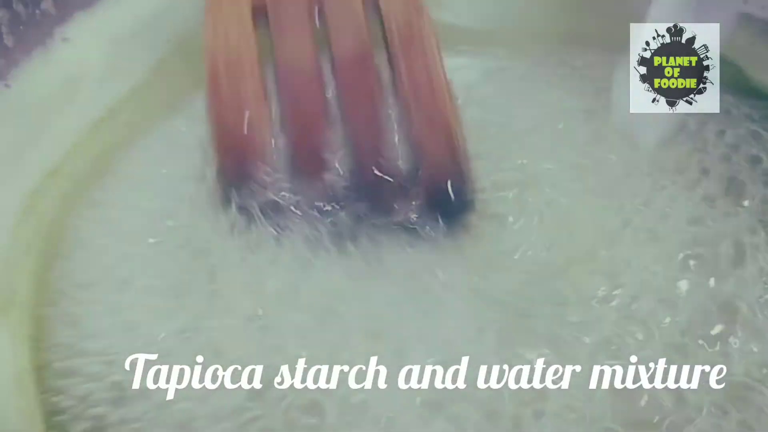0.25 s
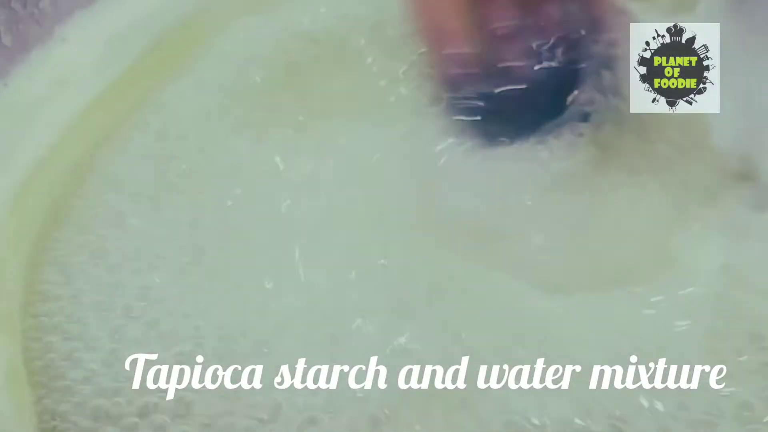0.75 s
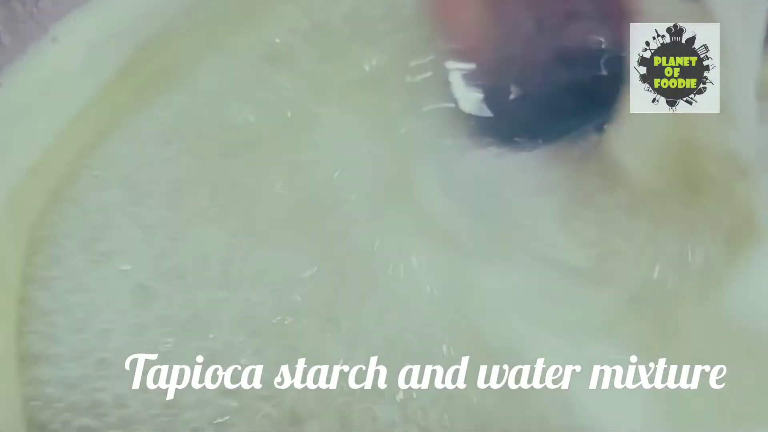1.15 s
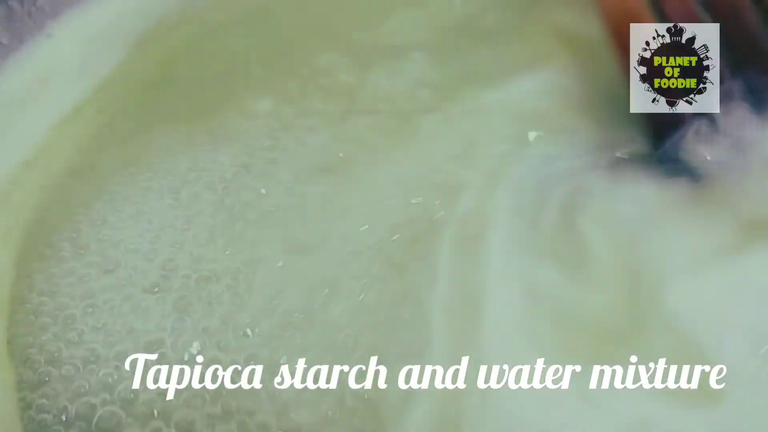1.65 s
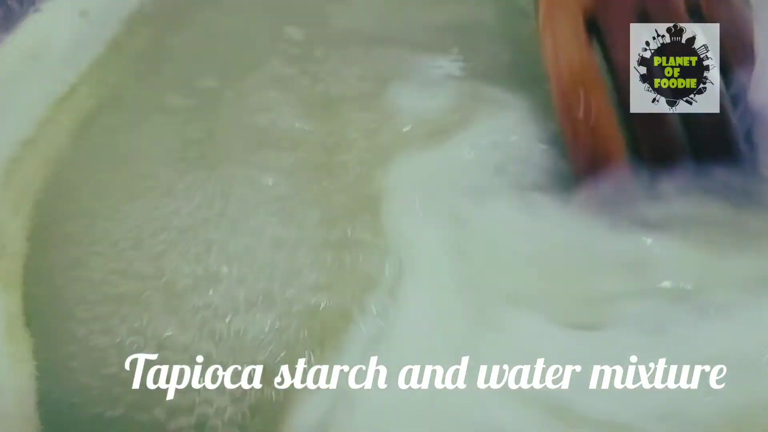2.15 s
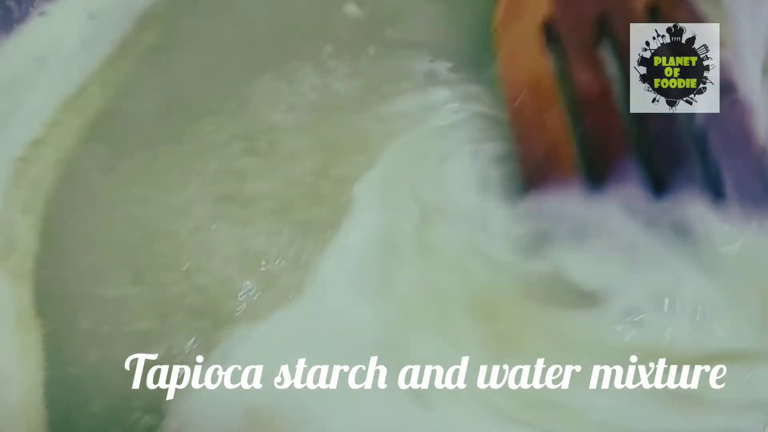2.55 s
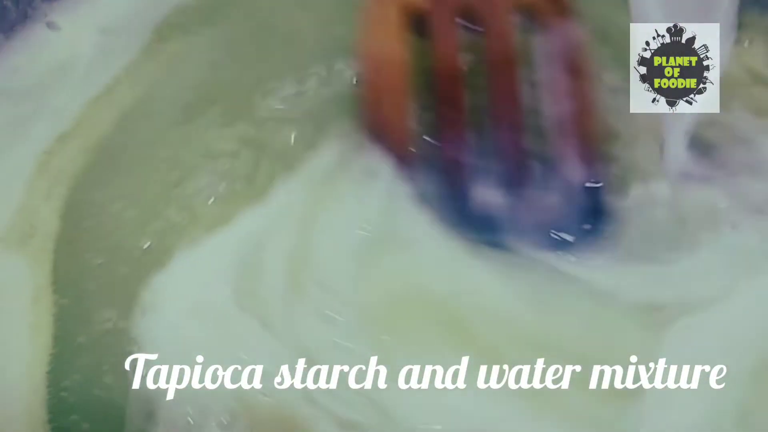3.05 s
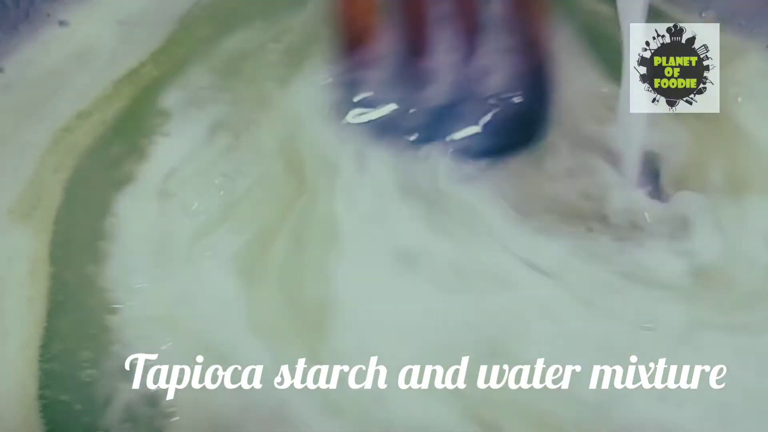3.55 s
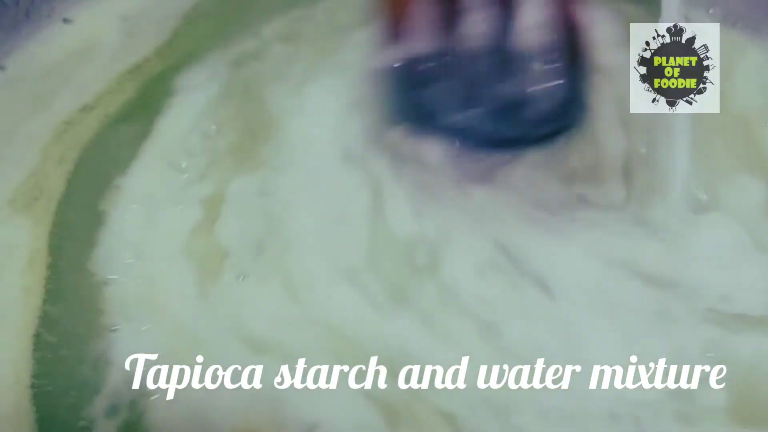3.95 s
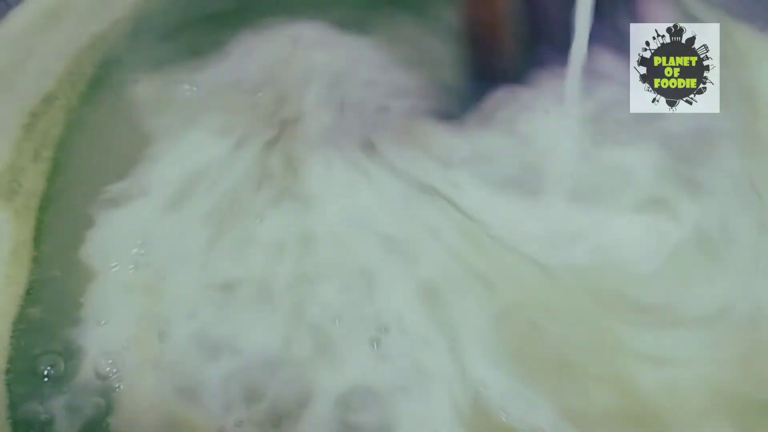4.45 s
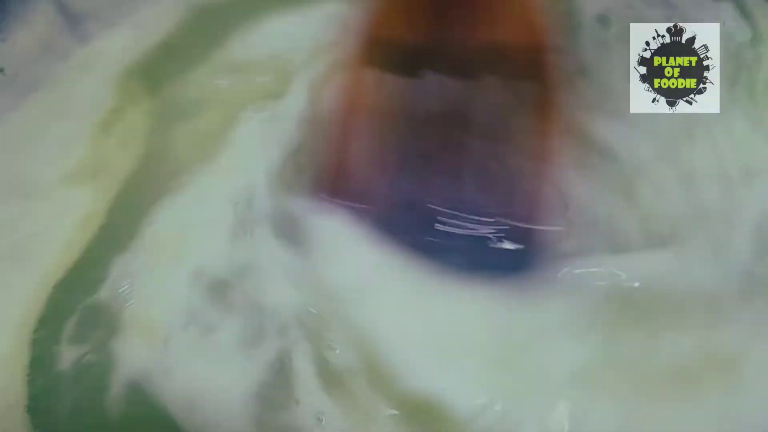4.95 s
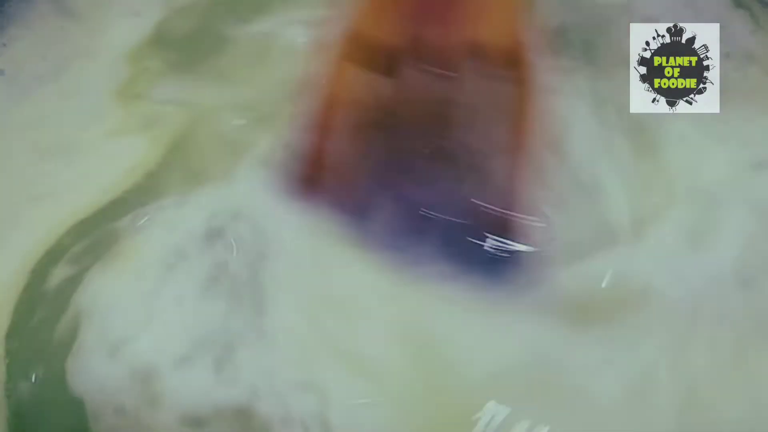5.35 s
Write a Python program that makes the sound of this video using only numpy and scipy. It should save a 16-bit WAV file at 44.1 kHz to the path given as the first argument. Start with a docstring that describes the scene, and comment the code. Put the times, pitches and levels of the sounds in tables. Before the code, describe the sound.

Close wet sizzling and bright popping over a foamy simmer, calming as thick liquid is stirred, with soft wooden bumps near the end.

```python
"""Stirring starch slurry into boiling syrup with a wooden spatula, close, over a kitchen's hum and rush.
From the start: dense simmer (swarms of filtered bubble rings), fading as the slurry cools it; brief dip at 0.3 s.
From 0.3 s: strokes wash syrup up the hot wall: sizzle (bubble swarms) and crackle (snapping droplets), sparse
after 4.5 s. From 0.7 s: foam dragged through the spatula (higher bubbles). From 0.9 s: air plops (rising rings).
From 1.8 s to the end: knocks on the pan (noise cracks and damped modes)."""
import sys
import numpy as np
from scipy import signal
from scipy.fft import rfft, irfft
from scipy.io import wavfile
from scipy.ndimage import uniform_filter1d

SR = 44100
rng = np.random.default_rng(int(sys.argv[2]) if len(sys.argv) > 2 else 0)


def int16_out(signal):
    """Quantize to a 16-bit WAV file."""
    q = np.round(np.clip(np.atleast_2d(signal).T, -1, 1) * 32767)
    wavfile.write(sys.argv[1], SR, q.astype(np.int16))


N = 246738
TIME_S = np.arange(N) / SR

# background hum: f/Hz, level/dB
HUM_TONES = [(42, -64), (121.5, -50.5)]
# spectrum of the kitchen rush: f/Hz, relative density/dB per Hz
RUSH_SPECTRUM = [(20, -3), (32, -2), (42, 13), (60, 4), (85, -2), (190, 4), (300, -3.5), (430, -3),
                 (900, -10), (1300, -24.5), (1900, -18.5), (2900, -52.5), (5000, -63.5)]
# simmer level, dips briefly, then fades with cooling: t/s, level/dB
SIMMER_LEVEL = [(0, -37.5), (0.29, -38.5), (0.32, -47.5), (0.375, -46.5), (0.41, -37.5), (0.5, -41.5),
                (0.75, -39.5), (0.95, -40), (1.3, -43), (1.7, -44.5), (2.2, -45), (3.5, -52.5),
                (5.6, -57.5)]
# filter of the simmering foam: f/Hz, gain/dB
FOAM_FILTER = [(150, -30), (430, -7), (540, -8), (800, -2), (1100, -4), (1500, -10.5), (1950, -10.5),
               (2400, -21), (3000, -48.5)]
# filter of the rolling boil: f/Hz, gain/dB
BOIL_FILTER = [(750, -1), (980, 1), (1300, -5.5), (1600, -15.5)]
# spectrum of the finest froth: f/Hz, relative density/dB per Hz
FROTH_SPECTRUM = [(3000, -16.5), (4500, -8), (6500, 10), (8500, -38.0), (10000, -50.5)]
# spatula dragged through foam: t/s, length/s, level/dB
SWIRL_STROKES = [(0.702, 0.13, -51.5), (1.07, 0.19, -51.5), (4.19, 0.014, -56)]
# filter of the dragged foam: f/Hz, gain/dB
SWIRL_FILTER = [(900, -11.5), (1400, -3.5), (1900, -1.5), (2300, -8), (2900, -15)]
# filter of the small pops: f/Hz, gain/dB
SQUELCH_FILTER = [(800, -5.5), (2000, -2.0), (2700, -9.0)]
# air pockets closed by the spatula: t/s, f/Hz, level/dB, ring to -20 dB/cycles, pitch rise/share
AIR_PLOPS = [(0.912, 1030, -39.5, 16, 0.049), (0.952, 565, -37.5, 19, 0.046), (1.401, 1490, -39, 19, 0.086),
             (1.439, 997, -36, 17, 0.18), (1.501, 2020, -43.5, 19, .08), (1.538, 2950, -46, 10, .15),
             (1.614, 1480, -39.5, 16, 0.12), (1.732, 1950, -36, 23, 0.079), (1.774, 1660, -42, 17, .1),
             (1.817, 2650, -44.5, 30, .04), (1.832, 1910, -36, 13, 0.14), (1.888, 1390, -43, 14, .08),
             (2.258, 1440, -35.5, 14, .1), (2.623, 1054, -35, 24, 0.15), (2.764, 1650, -35, 6.4, 0.069),
             (3.127, 1330, -44.5, 24, 0.037), (3.193, 3540, -43.5, 9, .1), (3.193, 2030, -41, 6.5, 0.11),
             (3.237, 2480, -45.5, 22, 0.055), (3.237, 996, -35.5, 15, 0.28), (3.275, 1760, -46, 25, 0.12),
             (3.486, 2050, -47.5, 14, 0.045), (3.569, 2340, -43.5, 30, 0.07), (3.802, 3580, -54, 46, 0.11),
             (3.921, 1890, -48, 14, .06), (4.318, 1830, -47, 9, 0.11), (4.4, 1120, -31, 5.9, 0.21),
             (4.416, 1780, -44, 8.8, .1), (4.43, 1840, -40, 9.4, .06), (4.457, 1170, -42, 6.9, .1),
             (4.498, 1780, -45, 12, .05), (5.143, 1480, -47.5, 14, 0.12)]
# spatula on pan, before room and tone filter: t/s, level/dB, blow centre f/Hz, ring against crack level/dB
PAN_KNOCKS = [(1.8173, -46, 2170, -15), (2.8258, -30, 740, 2), (3.912, -50.5, 1850, -3.5),
              (3.9936, -34.5, 1970, -17), (4.069, -41.5, 1500, -20), (4.237, -39.5, 840, -11),
              (4.430, -31.5, 1080, -19), (4.474, -35, 950, -7), (4.760, -42.5, 1997, -20),
              (4.929, -38, 654, -15), (5.2824, -35, 620, -17), (5.537, -45.5, 1310, 3)]
# modes of the filled pan: f/Hz, level/dB, t60/s
PAN_MODES = [(409, -1.5, 0.37), (500, 7.5, 0.04), (651, -1, 0.1), (868, -8, 0.23), (1064, -2, 0.17),
             (1257, -4.5, 0.059), (1720, -9.5, 0.46), (1980, -4.5, 0.42), (2428, -6.5, 0.18),
             (2700, -6.5, 0.12), (4190, 5, 0.19), (4560, 10.5, 0.34), (5060, 5.5, 0.29), (5720, 2, 0.15)]
# tone filter of the knocks: f/Hz, gain/dB
KNOCK_FILTER = [(200, 3), (5400, -3.5), (8000, -18.5)]
# strokes washing syrup up the wall: t/s, length/s, wetness as a sizzle level/dB
WALL_STROKES = [(0.281, .1, -39), (0.437, .12, -39), (0.635, .24, -35), (0.969, .45, -38),
                (1.507, .13, -33), (1.723, .27, -38.5), (2.195, .2, -37.5), (2.549, .17, -39),
                (2.798, .015, -35), (3.02, .03, -40), (3.168, .24, -39), (3.568, .14, -39.5),
                (3.785, .02, -40), (3.99, .06, -40.5), (4.148, .05, -39), (4.299, .14, -36),
                (4.737, .02, -43), (4.861, .05, -42), (5.096, .04, -40), (5.256, 0.028, -42),
                (5.444, .02, -42), (5.531, .03, -38.5)]
# filter of sizzle and droplets: f/Hz, gain/dB
SIZZLE_FILTER = [(1500, -26), (2300, -30), (3000, -44.5), (3700, -35.5), (4500, -23.5), (5100, -20.5),
                 (6300, -16.5), (7050, -5.5), (7550, 0.5), (7850, -8), (8150, -23), (8450, -37.5),
                 (9200, -41.5), (11000, -62), (15000, -79)]
# faint, very high noise ticks: t/s, peak level/dB
HIGH_TICKS = [(0.2839, -41), (0.4514, -47), (0.704, -40), (1.5547, -35.5), (3.665, -45)]
# spectrum of the high ticks: f/Hz, relative density/dB per Hz
HIGH_TICK_SPECTRUM = [(7000, -8.5), (9000, 5.5), (11500, 2), (15500, -14)]
# clear, short, high rings: t/s, f/Hz, level/dB
CLEAR_PINGS = [(0.305, 6050, -30), (0.556, 5800, -24), (0.5826, 4660, -35.5), (0.69, 5760, -32),
               (0.848, 6050, -26), (0.863, 5040, -26.5), (0.948, 5900, -25), (1.296, 5480, -30),
               (1.398, 5200, -30), (1.416, 5470, -29), (1.536, 5750, -30), (1.699, 5340, -32),
               (2.24, 4700, -36.5), (2.6255, 4560, -34), (2.795, 5100, -40), (2.8156, 4700, -36),
               (3.5894, 4980, -31.5), (4.273, 4730, -34), (4.3015, 5040, -24), (4.3775, 5900, -25.5),
               (4.42, 5300, -34), (4.4298, 5180, -25.5), (5.195, 4700, -40), (5.281, 4450, -35)]
# loudest droplets bursting on the wall: t/s (the peak follows about 1 ms later), peak level/dB
LOUD_CRACKLES = [(0.2548, -25), (0.263, -21.5), (0.3051, -6.5), (0.3614, -19), (0.3729, -21), (0.4604, -6),
                 (0.543, -19.5), (0.556, -9), (0.5995, -20.0), (0.6371, -6.5), (0.6918, -15),
                 (0.706, -14.5), (0.7254, -9.5), (0.776, -19), (0.7797, -22.5), (0.815, -14.5),
                 (0.8195, -20), (0.8253, -20.0), (0.837, -13), (0.8473, -26), (0.8552, -10), (0.863, -12.5),
                 (0.948, -27), (0.9616, -21), (0.9735, -12.5), (0.977, -21), (0.995, -16.5), (1.0298, -21),
                 (1.0788, -21.0), (1.088, -18.5), (1.1854, -19.5), (1.2212, -17.5), (1.2249, -14.5),
                 (1.2442, -16.5), (1.2637, -16.5), (1.299, -10.5), (1.367, -10), (1.393, -18),
                 (1.3967, -7.5), (1.4003, -14), (1.4156, -20.5), (1.472, -13.5), (1.4895, -27),
                 (1.501, -17.0), (1.5366, -13), (1.558, -7.5), (1.566, -13), (1.5741, -9.5), (1.6163, -15),
                 (1.6245, -12), (1.6445, -15.0), (1.6972, -18.5), (1.7315, -25), (1.8123, -14.0),
                 (1.817, -11), (1.8289, -20), (1.852, -20.5), (1.9433, -16.5), (1.981, -21),
                 (1.9932, -21.5), (2.1982, -16.5), (2.2033, -21.0), (2.2396, -16), (2.2588, -14.5),
                 (2.3193, -12.5), (2.35, -15), (2.3941, -16), (2.41, -18.0), (2.5727, -16.0),
                 (2.6254, -18.5), (2.6425, -17.0), (2.6714, -21.5), (2.7204, -13), (2.738, -19),
                 (2.7462, -22.0), (3.0319, -18), (3.1163, -20.5), (3.182, -15), (3.202, -12),
                 (3.2073, -10.5), (3.2763, -15), (3.2882, -7.5), (3.321, -20.5), (3.3564, -22),
                 (3.3768, -16.5), (3.4636, -25), (3.5538, -10.5), (3.568, -21), (3.5884, -14.0),
                 (3.6168, -19), (3.6327, -18), (3.6453, -16.5), (3.6538, -18.5), (3.6633, -25),
                 (3.6934, -16), (3.7003, -10.5), (3.7061, -18), (3.912, -22), (3.993, -13), (4.0092, -13.5),
                 (4.0587, -22), (4.0963, -17.5), (4.1686, -11.5), (4.2337, -13.5), (4.2719, -16.5),
                 (4.2996, -18), (4.3022, -11.5), (4.3163, -18), (4.3364, -21), (4.3684, -13.5),
                 (4.3777, -20), (4.388, -17), (4.4294, -16), (4.439, -22), (4.5154, -22), (4.844, -20.5),
                 (5.2829, -14), (5.5375, -17.5)]

BOIL_DB, BOIL_COOLING_DB_PER_S = -1.5, 4.5  # boil against simmer
FROTH_START_DB, FROTH_COOLING_DB_PER_S = -51.5, 3.5
SQUELCH_DB = -22.5  # against wall wetness
WASH_ATTACK_S, WASH_RELEASE_S = 0.044, 0.071  # syrup runs up, boils off
RIM_START_DB, RIM_COOLING_DB_PER_S = -42, 0.66  # wetness between strokes
DROPLET_COUNT, DROPLET_PEAK_DB = 110, 11  # lesser droplets; peak against wetness
SNAP_HZ, SNAP_SPREAD_SHARE, SNAP_RISE_S = 7136, 0.074, 0.0011  # droplet ring; its time to peak
DROPLET_LOW_HZ, DROPLET_HIGH_HZ, DROPLET_BUBBLE_DB = 5110, 6890, -24.5  # bubble; level against snap's peak
TOP_HZ = 15800


def undb(db):
    """Decibels to gain."""
    return 10 ** (np.asarray(db) / 20)


def level(x, db):
    """Scale to an rms level."""
    return x * undb(db) / np.sqrt(np.mean(x ** 2))


def burst_level(x, db, size=176):
    """Scale a short sound so that its loudest 4 ms have this rms level."""
    return x * undb(db) / np.sqrt(uniform_filter1d(x ** 2, size).max())


def colour(x, points):
    """Zero-phase filter through (Hz, dB) points, falling 20 dB per octave beyond its ends."""
    hz, db = np.transpose(points)
    octave = np.log2(np.maximum(np.fft.rfftfreq(len(x), 1 / SR), 1))
    beyond = np.abs(octave - np.clip(octave, np.log2(hz[0]), np.log2(hz[-1])))
    gain_db = np.interp(octave, np.log2(hz), db) - 20 * beyond
    return irfft(rfft(x) * undb(gain_db), len(x))


def walk(rate_hz):
    """Smoothed random steps with an rms of 1."""
    size = max(int(SR / rate_hz), 1)
    steps = np.repeat(rng.standard_normal(N // size + 1), size)[:N]
    smooth = uniform_filter1d(uniform_filter1d(steps, size), size)
    return level(smooth, 0)


def add(out, start_s, x):
    """Mix a short sound in at a time."""
    start = int(np.clip(start_s * SR, 0, N))
    out[start:start + len(x)] += x[:N - start]


def swell(start_s, length_s, attack_s, release_s):
    """Stroke envelope: rises before start_s, holds, dies away exponentially."""
    rise = np.clip(1 + (TIME_S - start_s) / attack_s, 0, 1)
    return rise * np.exp(-np.maximum(TIME_S - start_s - length_s, 0) / release_s)


def bubble(t_s, hz, cycles, rise):
    """Damped bubble ring: fades 20 dB in the given cycles while its pitch rises by the share."""
    age = t_s * hz / cycles
    phase = 2 * np.pi * hz * t_s * (1 + rise * np.minimum(age, 2) / 2)
    return np.sin(phase) * 10 ** -age


def swarm(low_hz, high_hz, cycles, rise, spread_db, count, size):
    """Sum of small bubbles with random times, pitches, dampings and strengths."""
    when, pitch, loud, damping = rng.random((count, 4)).T
    hz = low_hz * (high_hz / low_hz) ** pitch
    rings = bubble(np.arange(size) / SR, hz[:, None], cycles * (.5 + damping[:, None]), rise)
    gain = undb(-spread_db * np.sqrt(loud))  # many faint, few strong
    at = (when * N).astype(int)[:, None] + np.arange(size)
    return np.bincount(at.ravel(), (rings * gain[:, None]).ravel(), N)[:N]


def room(x, t60_s=0.21, wet_db=-11, size=12000):
    """Worktop and walls reflect a short decaying noise tail."""
    tail = rng.standard_normal(size) * np.exp(-np.log(1000) * np.arange(size) / SR / t60_s)
    return x + undb(wet_db) * signal.fftconvolve(x, tail / np.linalg.norm(tail))[:N]


def kitchen(waver=0.66, phase_waver_rad=0.69):
    """Steady low filtered noise plus a hum that wavers in pitch and strength."""
    out = level(colour(rng.standard_normal(N), RUSH_SPECTRUM), -45)
    for hz, db in HUM_TONES:
        tone = np.sin(2 * np.pi * hz * TIME_S + phase_waver_rad * walk(10))
        out += level(tone * (1 + waver * walk(13)), db)
    return out


def froth():
    """Finest foam gives an even hiss, fading as it cools."""
    hiss = level(colour(rng.standard_normal(N), FROTH_SPECTRUM), FROTH_START_DB)
    return hiss * undb(-FROTH_COOLING_DB_PER_S * TIME_S)


def foam():
    """Soft bubbles merge into a simmer that cooling fades; the brighter rolling boil dies faster."""
    bubbles = swarm(240, 2600, cycles=3, rise=.1, spread_db=8, count=9000, size=300)
    rolling = swarm(700, 1800, cycles=4, rise=.1, spread_db=4, count=9000, size=300)
    boil = level(colour(rolling, BOIL_FILTER), BOIL_DB) * undb(-BOIL_COOLING_DB_PER_S * TIME_S)
    simmer = level(colour(bubbles, FOAM_FILTER), 0) + boil
    return simmer * undb(np.interp(TIME_S, *np.transpose(SIMMER_LEVEL)))


def swirl(attack_s=0.046, release_s=0.05):
    """Foam dragged through the spatula's slots breaks into smaller, higher bubbles."""
    bubbles = swarm(1350, 2020, cycles=8, rise=.1, spread_db=8, count=2000, size=400)
    bubbles = level(colour(bubbles, SWIRL_FILTER), 0)
    drag = sum(undb(db) * swell(s, length_s, attack_s, release_s) for s, length_s, db in SWIRL_STROKES)
    return bubbles * drag


def squelch(wet):
    """Stirring pops small bubbles in the thick mixture, stronger on each stroke."""
    pops = swarm(880, 2370, cycles=6.6, rise=0.21, spread_db=16.5, count=450, size=700)
    return level(colour(pops, SQUELCH_FILTER), SQUELCH_DB) * wet


def plops(attack_s=0.00026, size=3000):
    """Trapped air rings briefly in thick liquid, rising in pitch as it nears the surface."""
    out, t_s = np.zeros(N), np.arange(size) / SR
    onset = 1 - np.exp(-t_s / attack_s)
    for s, hz, db, cycles, rise in AIR_PLOPS:
        add(out, s, burst_level(bubble(t_s, hz, cycles, rise) * onset, db))
    return out


def knocks(crack_s=0.002, softness_db_per_octave=8.5, clatter_s=0.014, clatter_db=-4, size=8192):
    """Wood bumps the liquid-damped pan: a short crack plus modes, strongest near the blow's centre."""
    out, t_s = np.zeros(N), np.arange(size) / SR
    for s, db, centre_hz, ring_db in PAN_KNOCKS:
        modes = np.zeros(size)
        for hz, mode_db, t60_s in PAN_MODES:
            gain = undb(mode_db - softness_db_per_octave * abs(np.log2(hz / centre_hz)))
            decay = np.exp(-np.log(1000) * t_s / t60_s)
            modes += gain * decay * np.sin(2 * np.pi * hz * t_s) * rng.choice([-1, 1])
        # a ringing blow also sets the wooden blade clattering
        push = np.exp(-t_s / crack_s) + undb(ring_db + clatter_db) * np.exp(-t_s / clatter_s)
        contact = [(centre_hz / 1.4, -3), (min(centre_hz, 2200), 0),
                   (min(1.57 * centre_hz, 2400), -6), (3000, -29)]
        crack = colour(np.pad(rng.standard_normal(size) * push, size), contact)
        ring = np.pad(burst_level(modes, ring_db), size)
        add(out, s - size / SR, burst_level(ring + burst_level(crack, 0), db))
    return colour(out, KNOCK_FILTER)


def wash():
    """Wall wetness: each stroke wets, holds and boils off, over a slowly cooling rim; powers add."""
    power = undb(RIM_START_DB - RIM_COOLING_DB_PER_S * TIME_S) ** 2
    for s, length_s, db in WALL_STROKES:
        power += (undb(db) * swell(s, length_s, WASH_ATTACK_S, WASH_RELEASE_S)) ** 2
    return np.sqrt(power)


def sizzle(wet):
    """Syrup on the hot wall: fine fizz and sparser ticks in little flurries, scaled by wetness."""
    fizz = swarm(3000, 9000, cycles=2, rise=0, spread_db=8, count=20000, size=48)
    ticks = swarm(3700, 8300, cycles=9, rise=.03, spread_db=24, count=2600, size=200)
    flurry = undb(4.3 * np.tanh(walk(60)))
    fizz = level(colour(fizz, SIZZLE_FILTER), -6.5)
    ticks = level(colour(ticks, SIZZLE_FILTER), -7.0)
    return (fizz + ticks) * flurry * wet


def high_ticks(decay_s=0.0029, size=512):
    """Faint, very high noise ticks with short tails."""
    out = np.zeros(N)
    decay = np.exp(-np.arange(size) / SR / decay_s)
    for s, db in HIGH_TICKS:
        tick = colour(np.pad(rng.standard_normal(size) * decay, size), HIGH_TICK_SPECTRUM)
        add(out, s - size / SR, undb(db) * tick / np.abs(tick).max())
    return out


def ping(hz, cycles, attack_s=0.00033, size=1024):
    """High damped ring of one tiny bubble, with a soft onset."""
    t_s = np.arange(size) / SR
    return bubble(t_s, hz, cycles, rise=0.012) * (1 - np.exp(-(t_s / attack_s) ** 2))


def pings(cycles=14):
    """Some bursts have a clear, short ring at 4.4 to 6 kHz."""
    out = np.zeros(N)
    for s, hz, db in CLEAR_PINGS:
        add(out, s, burst_level(ping(hz, cycles), db))
    return out


def droplet(ring_s=0.00055, snap_s=0.0025, snap_db=-7, scatter_s=0.0022, scatter_db=-31, cycles=13, size=1024):
    """A droplet snaps, rings over a faint lower bubble and scatters round the pan; padded, peak 1."""
    t_s, noise = np.arange(size) / SR, rng.standard_normal(size)
    ring_hz = SNAP_HZ * (1 + SNAP_SPREAD_SHARE * (2 * rng.random() - 1))
    ring = np.sin(2 * np.pi * ring_hz * t_s) * np.exp(-t_s / (ring_s * (.5 + rng.random())))
    snap = noise * (undb(snap_db) * np.exp(-t_s / snap_s) + undb(scatter_db) * np.exp(-t_s / scatter_s))
    bright = colour(np.pad(ring + snap, size), SIZZLE_FILTER)
    low_hz = DROPLET_LOW_HZ + (DROPLET_HIGH_HZ - DROPLET_LOW_HZ) * rng.random()
    low = np.pad(ping(low_hz, cycles, size=size), size)
    burst = bright / np.abs(bright).max() + burst_level(low, DROPLET_BUBBLE_DB)
    return burst / np.abs(burst).max()


def crackles(wet, size=1024):
    """Loud droplets burst at set times, lesser ones at random, more often and stronger on a wet wall."""
    out = np.zeros(N)
    for s, db in LOUD_CRACKLES:
        add(out, s + SNAP_RISE_S - size / SR, undb(db) * droplet(size=size))
    due = np.cumsum(wet ** 2)  # equal shares of wet power, one droplet in each
    shares = (np.arange(DROPLET_COUNT) + rng.random(DROPLET_COUNT)) / DROPLET_COUNT
    strength = wet * undb(DROPLET_PEAK_DB)
    for start in np.searchsorted(due, due[-1] * shares):
        add(out, (start - size) / SR, strength[start] * droplet(size=size))
    return out


def scene():
    """Sum at one microphone, same on both channels; liquid and pan sounds pass through the room."""
    wet = wash()
    pan = room(foam() + froth() + swirl() + squelch(wet) + plops() + knocks())
    bright = sizzle(wet) + high_ticks() + pings() + crackles(wet)
    mono = kitchen() + pan + bright
    return np.array([mono, mono])


def record(dry):
    """Steep elliptic low-pass at TOP_HZ."""
    return signal.sosfilt(signal.ellip(8, .2, 70, TOP_HZ, fs=SR, output="sos"), dry)


dry = scene()
out = record(dry)
int16_out(out)
```